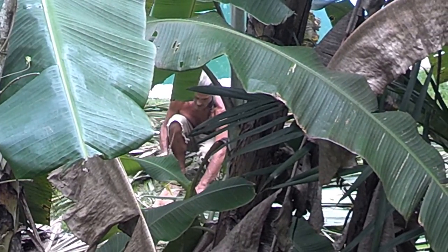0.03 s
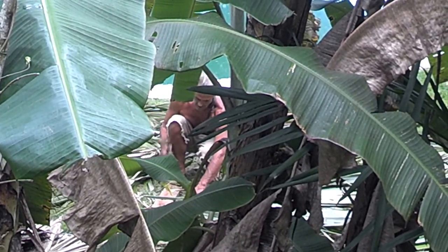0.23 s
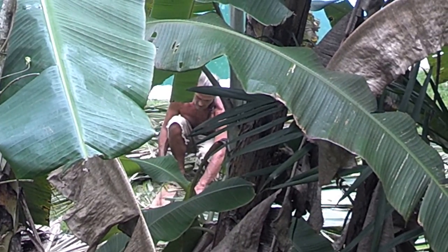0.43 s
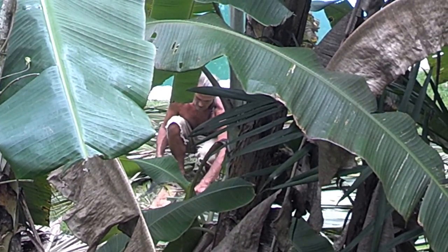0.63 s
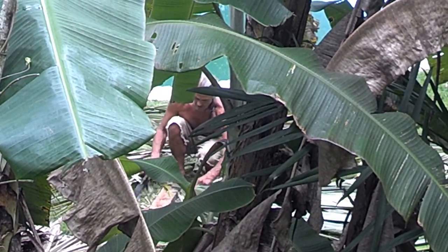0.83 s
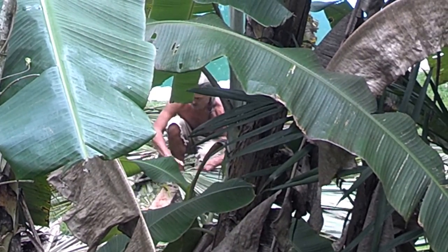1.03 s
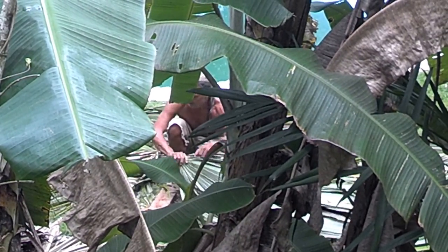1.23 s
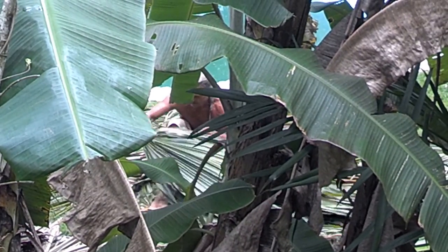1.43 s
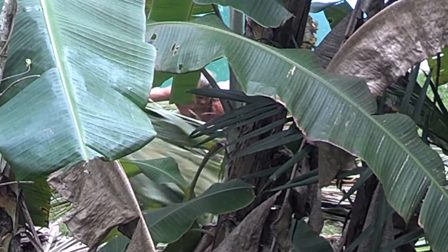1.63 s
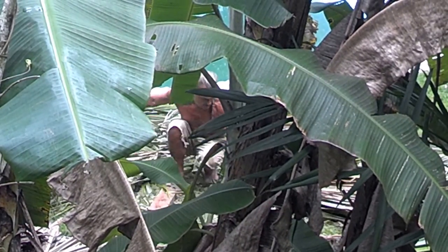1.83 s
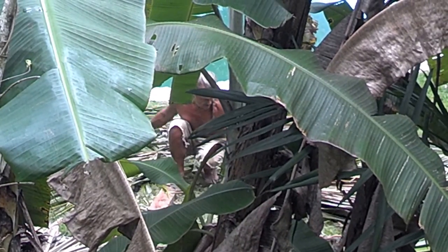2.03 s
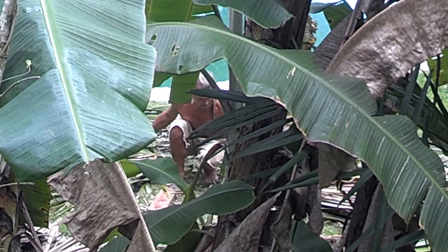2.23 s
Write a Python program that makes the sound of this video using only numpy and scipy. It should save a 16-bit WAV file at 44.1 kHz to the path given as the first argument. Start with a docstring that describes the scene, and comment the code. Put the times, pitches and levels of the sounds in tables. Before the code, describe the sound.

One sharp chop on a palm stalk outdoors, followed by fronds rustling over dry litter.

```python
"""Palm frond chopped and dragged

A blade chops once into a palm stalk: fibres split, the stalk rings, the grove throws the blow back.
The cut frond is gathered and dragged over dry litter: leaflets hiss, ribs crackle, the stalk knocks.
A two-port microphone with a stereo widener hears it over a faint outdoor floor."""
import sys
import numpy as np
from scipy import signal
from scipy.fft import rfft, irfft
from scipy.io import wavfile
from scipy.ndimage import uniform_filter1d

SR = 44100
rng = np.random.default_rng(int(sys.argv[2]) if len(sys.argv) > 2 else 0)


def transcribe(u):
    """Save the signal u as a 16-bit wav file named by the first command-line argument.

    u: samples, shape (n,) or (channels, n), limited to [-1, 1]; the rate is SR.
    q: integer samples, one column per channel.
    """
    v = np.clip(np.atleast_2d(u).T, -1, 1)
    q = np.round(v * 32767).astype(np.int16)
    wavfile.write(sys.argv[1], SR, q)


N = 101429

# outdoor floor (frequency [Hz], relative density [dB])
AIR_SPECTRUM = [(25, -24), (60, -14), (130, -2.5), (400, -4.5), (900, -14), (2000, -15), (4000, -28),
                (11000, -31), (15000, -21)]
AIR_DB = -54

# frond motion: before the chop, gathering, dragging (time [s], rib level [dB], leaflet level [dB])
STIR_LEVELS = [(0.0, -51, -48.5), (0.13, -50.5, -51), (0.172, -55, -51.5), (0.2, -48, -49)]
GATHER_LEVELS = [(0.4, -59, -60.5), (0.656, -67, -61), (0.738, -64, -56), (0.752, -52, -53),
                 (0.794, -55, -46.5), (0.978, -51, -54.5), (1.074, -51.5, -55), (1.198, -45.5, -50),
                 (1.225, -42, -49)]
DRAG_LEVELS = [(1.27, -41, -46), (1.37, -41, -46), (1.452, -40, -43.5), (1.496, -44, -47.5),
               (1.826, -44.5, -46), (1.93, -39.5, -42), (1.986, -41, -46.5), (1.992, -43, -46),
               (2.028, -41, -47), (2.034, -43, -48.5), (2.2, -44, -48.5)]
# rib crackle, leaflet hiss, rib snap, ground scrape (frequency [Hz], relative density [dB])
RIB_SPECTRUM = [(50, -14), (130, 1.5), (280, -3.5), (450, 0), (700, -3.5), (900, -1.5), (1300, -7),
                (1650, -7), (2100, -7), (2500, -8.5), (3300, -14.5), (4500, -25.5), (9000, -53)]
LEAF_SPECTRUM = [(500, -10), (2000, -13), (3500, 2), (5000, 1), (7200, 0), (9000, 0.5), (11000, -3.5),
                 (13000, -2), (15200, 0)]
SNAP_SPECTRUM = [(70, -28), (170, -1), (500, -1), (1000, 3.5), (1600, 0.5), (2200, 4), (2700, -15),
                 (3600, -18), (6000, -28)]
SCRAPE_SPECTRUM = [(80, -24), (200, -4), (390, 2), (700, -7), (1200, -6), (2200, -16), (4000, -25)]
RIB_TRIM_DB, RIB_CLICKS_PER_S, RIB_SPREAD_DB, RIB_FLUTTER_DB = -3.5, 2500, 1, 0.66
LEAF_TRIM_DB, LEAF_CLICKS_PER_S, LEAF_SPREAD_DB, LEAF_FLUTTER_DB = -3, 9000, 2, 0.74

# rib snaps, leaflet ticks, stalk knocks (time [s], level [dB])
RIB_SNAPS = [(1.2276, -41), (1.2427, -31.5), (1.2473, -38), (1.2523, -44), (1.455, -45), (1.922, -40),
             (1.955, -37)]
LEAF_TICKS = [(0.109, -45), (.178, -43), (.347, -41.5)]
STALK_KNOCKS = [(1.456, -39.5), (1.717, -41.5), (1.849, -42.5), (1.982, -44.5), (2.024, -42),
                (2.213, -39.5), (2.266, -56)]
SNAP_T60_S, TICK_T60_S, KNOCK_PUSH_S = 0.027, 0.011, 0.00019
# fronds scraping the ground (time [s], level [dB], Gaussian sigma [s])
GROUND_SCRAPES = [(0.49, -61, .03), (0.972, -50.5, 0.023), (1.287, -50, 0.032), (1.53, -50.5, 0.029)]
# stalk modes, dragged and chopped (frequency [Hz], relative level [dB], T60 [s])
DRAGGED_MODES = [(893, 1, 0.07), (940, -4.5, .04), (1335, -2.5, .03), (1660, -4, 0.041)]
CHOPPED_MODES = [(250, -12, 0.078), (436, -19, 0.032), (609.5, 3, 0.098), (870, -8, 0.02),
                 (952, -11.5, 0.08), (1163, 1.5, 0.028), (1352, -1.5, .13), (1383, -3.5, 0.042),
                 (1596, -13, 0.029), (1700, -9, .05), (1985, -2.5, 0.05), (2012, -1, 0.078),
                 (2065, -15, 0.3), (3590, 6, 0.057)]

# grove reverberation, splitting fibres (frequency [Hz], relative density [dB])
GROVE_SPECTRUM = [(100, -20), (350, -21), (600, -6), (800, -6), (950, 3), (1120, -11), (1350, -3),
                  (1600, -3), (2050, 4), (4000, -3)]
SPLIT_SPECTRUM = [(60, -30), (180, -13), (500, 5), (1000, 0.5), (2100, -7), (2600, -16), (3400, -9.5),
                  (4500, -44), (15000, -28)]
GROVE_DB, GROVE_ONSET_S, GROVE_T60_S = -14.5, 0.013, 0.68
ECHO_S, ECHO_SIGMA_S, ECHO_DB = 0.076, 0.014, -5
SPLIT_DB, SPLIT_T60_S = -21.5, 0.075
CRACK_S, CRACK_DB, CRACK_SIGMA_S, CRACK_TAIL_DB, CRACK_T60_S = 0.2246, -36, 0.0021, -8.5, 0.32
# blade contacts within the one chop (time [s], relative level [dB], push length [s])
BLADE_CONTACTS = [(.22305, -4.5, 0.00023), (.2248, -14.5, 0.000084), (.2266, 2, 0.00019)]
STALK_DB = -26
FLAT_HZ, SETTLE_S = 54.4, 0.013  # the entering blade loads the stalk

# microphone ports (frequency [Hz], side re mid [dB], lean to the left [-1..1])
PORT_RESPONSE = [(60, -5.5, 0.26), (350, -9, 0.14), (700, -8, .1), (1310, 1, -0.49), (1900, 2, -0.61),
                 (3180, 0, 1), (7500, 0, .6), (10500, -0.5, 0.52), (13000, -1, 0)]
PORT_LAG_S, PORT_LAG_TOP_HZ = 0.00008, 940
WIDEN_S, LOW_CUT_HZ, HIGH_CUT_HZ = 0.000363, 64, 15450

TIME_S = np.arange(N) / SR
BIN_HZ = np.arange(N + 1) * SR / (2 * N)


def undb(db):
    """Decibels to gain."""
    return 10 ** (np.asarray(db) / 20)


def unit_rms(x):
    """Scale to rms 1."""
    return x / np.sqrt(np.mean(x ** 2))


def per_bin(table, column=1):
    """Table column at every FFT bin, interpolated over log frequency."""
    table = np.array(table, float)
    return np.interp(np.log(BIN_HZ + 1), np.log(table[:, 0]), table[:, column])


def colour(x, spectrum):
    """Filter by a spectrum; rms 1."""
    return unit_rms(irfft(rfft(x, 2 * N) * undb(per_bin(spectrum)))[..., :N])


def noise(spectrum):
    """Independent coloured noises, rows (direct, diffuse)."""
    return colour(rng.standard_normal((2, N)), spectrum)


def decay(start_s, t60_s):
    """Instant attack, exponential decay."""
    age_s = TIME_S - start_s
    return (age_s >= 0) * np.exp(-np.log(1000) * np.maximum(age_s, 0) / t60_s)


def bell(centre_s, sigma_s):
    """Gaussian envelope, peak 1."""
    return np.exp(-0.5 * ((TIME_S - centre_s) / sigma_s) ** 2)


def wander(rate_hz):
    """Ramps between random values; rms 1."""
    hold = int(SR / rate_hz)
    steps = np.repeat(rng.standard_normal(N // hold + 1), hold)
    return unit_rms(uniform_filter1d(steps, hold)[:N])


def convolve(x, response):
    """Apply an impulse response by row."""
    return signal.fftconvolve(np.atleast_2d(x), np.atleast_2d(response), axes=1)[:, :N]


def ring(blows, modes, flat_hz):
    """Short pushes excite damped modes that start flat_hz low and settle."""
    pushes = [(db, bell(at_s, length_s / 2)) for at_s, db, length_s in blows]
    force = sum(undb(db) * push / push.sum() for db, push in pushes)
    lag_cycles = flat_hz * SETTLE_S * (1 - np.exp(-TIME_S / SETTLE_S))
    response = sum(undb(db) * np.sin(2 * np.pi * (hz * TIME_S - lag_cycles)) * decay(0, t60_s)
                   for hz, db, t60_s in modes)
    return convolve(force, response)


def clicks(per_s, spread_db):
    """Random impulses of unequal size, rows (direct, diffuse)."""
    sizes = undb(spread_db * np.minimum(rng.exponential(size=(2, N)), 5))
    return (rng.random((2, N)) < per_s / SR) * sizes * rng.choice([-1, 1], (2, N))


def direct_only(x):
    """Add a silent diffuse row."""
    return np.vstack([x, np.zeros_like(x)])


def outdoor_floor():
    """Faint steady noise."""
    return undb(AIR_DB) * noise(AIR_SPECTRUM)


def rustle():
    """Ribs crackle and leaflets hiss as the fronds move."""
    at_s, rib_db, leaf_db = np.vstack([STIR_LEVELS, GATHER_LEVELS, DRAG_LEVELS]).T
    rib_gain = undb(np.interp(TIME_S, at_s, rib_db) + RIB_TRIM_DB + RIB_FLUTTER_DB * wander(rate_hz=59.88))
    leaf_gain = undb(np.interp(TIME_S, at_s, leaf_db) + LEAF_TRIM_DB + LEAF_FLUTTER_DB * wander(rate_hz=80))
    crackle = colour(clicks(RIB_CLICKS_PER_S, RIB_SPREAD_DB), RIB_SPECTRUM)
    hiss = colour(clicks(LEAF_CLICKS_PER_S, LEAF_SPREAD_DB), LEAF_SPECTRUM)
    return rib_gain * crackle + leaf_gain * hiss


def handling():
    """Ribs snap, dry leaflets tick, the stalk knocks on litter, fronds scrape the ground."""
    snaps = sum(undb(db) * decay(at_s, SNAP_T60_S) for at_s, db in RIB_SNAPS) * noise(SNAP_SPECTRUM)
    ticks = sum(undb(db) * decay(at_s, TICK_T60_S) for at_s, db in LEAF_TICKS) * noise(LEAF_SPECTRUM)
    knocks = ring([(at_s, db, KNOCK_PUSH_S) for at_s, db in STALK_KNOCKS], DRAGGED_MODES, flat_hz=0)
    scrape_gain = sum(undb(db) * bell(at_s, sigma_s) for at_s, db, sigma_s in GROUND_SCRAPES)
    scrapes = scrape_gain * colour(clicks(RIB_CLICKS_PER_S, RIB_SPREAD_DB), SCRAPE_SPECTRUM)
    return snaps + ticks + direct_only(knocks) + scrapes


def grove(blow):
    """Trees scatter the blow: a decaying tail and one smeared echo."""
    scatter = decay(GROVE_ONSET_S, GROVE_T60_S) + undb(ECHO_DB) * bell(ECHO_S, ECHO_SIGMA_S)
    response = unit_rms(scatter * noise(GROVE_SPECTRUM)) / np.sqrt(N)
    return undb(GROVE_DB) * convolve(blow, response)


def chop():
    """The blade bites with a crack, fibres split, the stalk rings, the grove answers."""
    stalk = undb(STALK_DB) * ring(BLADE_CONTACTS, CHOPPED_MODES, FLAT_HZ)
    split = undb(SPLIT_DB) * decay(BLADE_CONTACTS[0][0], SPLIT_T60_S) * noise(SPLIT_SPECTRUM)
    bite = bell(CRACK_S, CRACK_SIGMA_S) + undb(CRACK_TAIL_DB) * decay(CRACK_S, CRACK_T60_S)
    crack = undb(CRACK_DB) * bite * noise(LEAF_SPECTRUM)
    return direct_only(stalk) + split + crack + grove(stalk + split[:1])


def scene():
    """Direct and diffuse sound at two close ports: alike in the bass, different in the treble."""
    direct, diffuse = rfft(chop() + rustle() + handling() + outdoor_floor(), 2 * N)
    lean = np.clip(per_bin(PORT_RESPONSE, column=2), -1, 1)
    blend = lean * direct + np.sqrt(1 - lean ** 2) * diffuse
    lag = 1j * np.pi * BIN_HZ * PORT_LAG_S / (1 + (BIN_HZ / PORT_LAG_TOP_HZ) ** 4)
    side = undb(per_bin(PORT_RESPONSE)) * blend + lag * direct
    return irfft(np.array([direct + side, direct - side]))[:, :N]


def record(dry):
    """Widener: each channel minus a late copy of the other; then low cut and high cut."""
    late_opposite = np.pad(dry[::-1], ((0, 0), (round(WIDEN_S * SR), 0)))[:, :N]
    low_cut = signal.butter(2, LOW_CUT_HZ, "high", fs=SR, output="sos")
    high_cut = signal.ellip(10, 0.2, 80, HIGH_CUT_HZ, fs=SR, output="sos")
    return signal.sosfilt(high_cut, signal.sosfilt(low_cut, dry - late_opposite))


dry = scene()
out = record(dry)
transcribe(out)
```